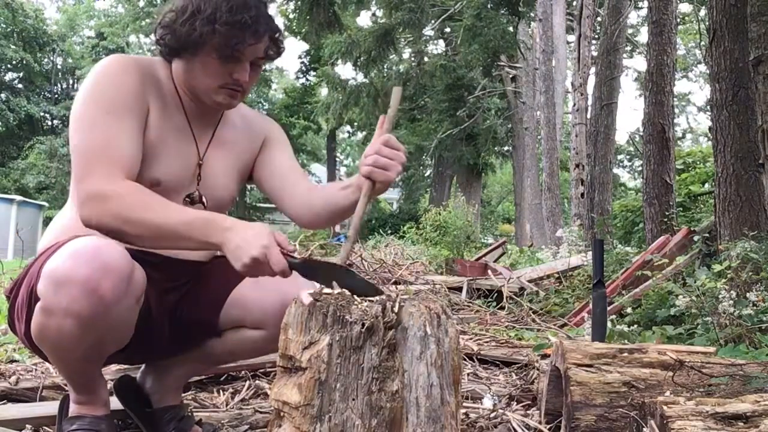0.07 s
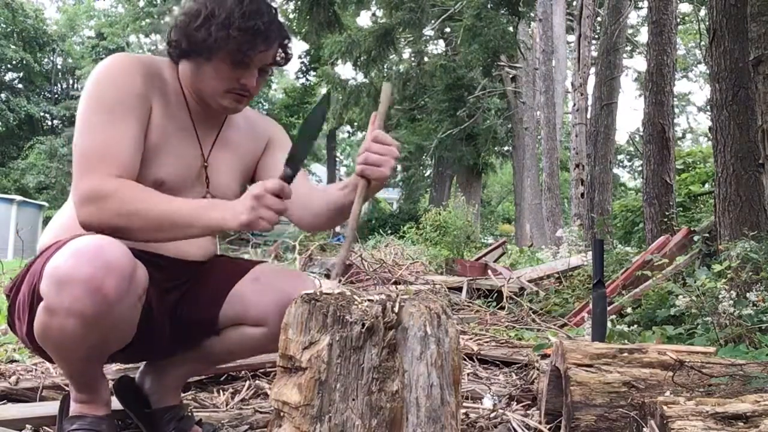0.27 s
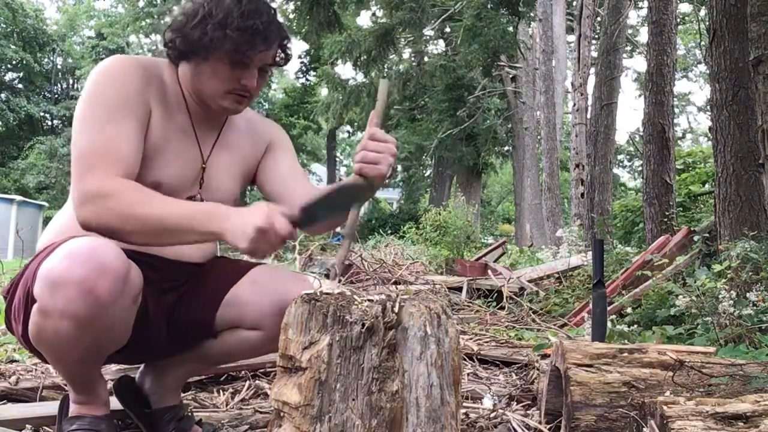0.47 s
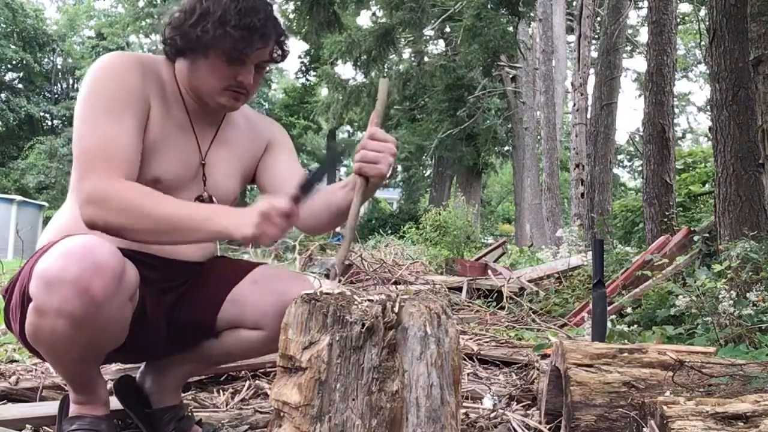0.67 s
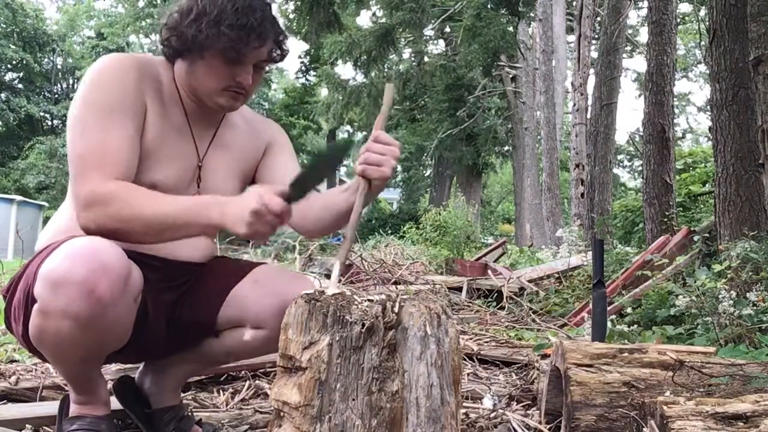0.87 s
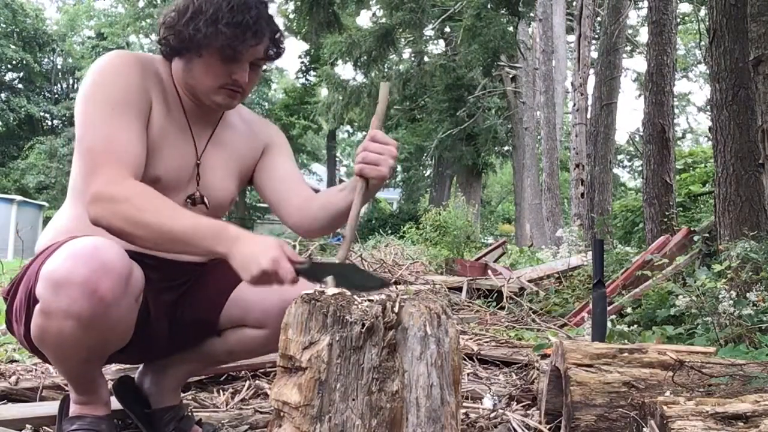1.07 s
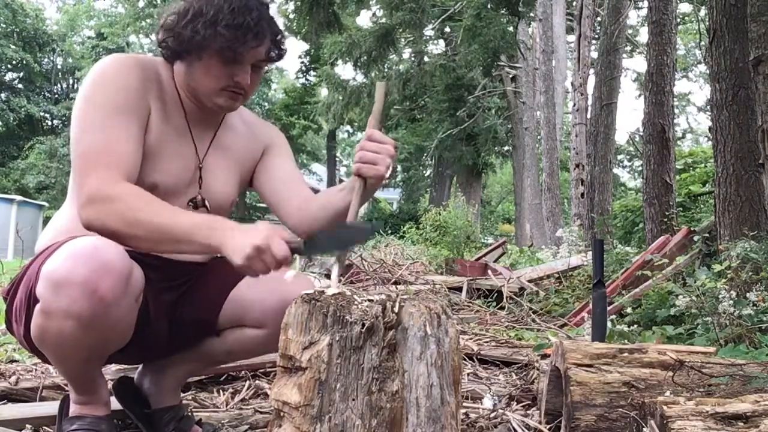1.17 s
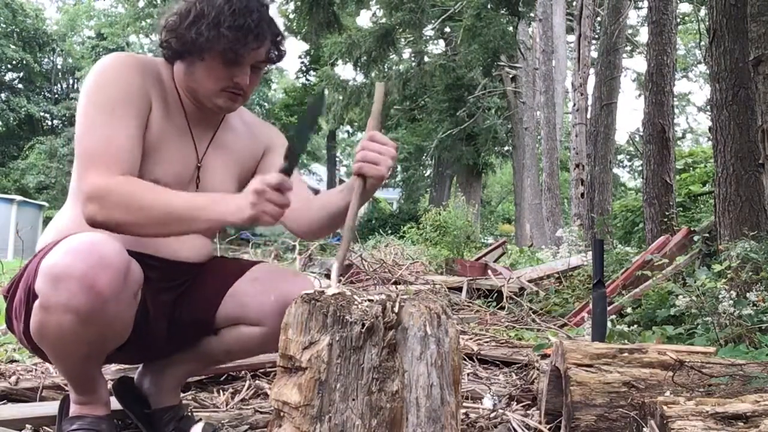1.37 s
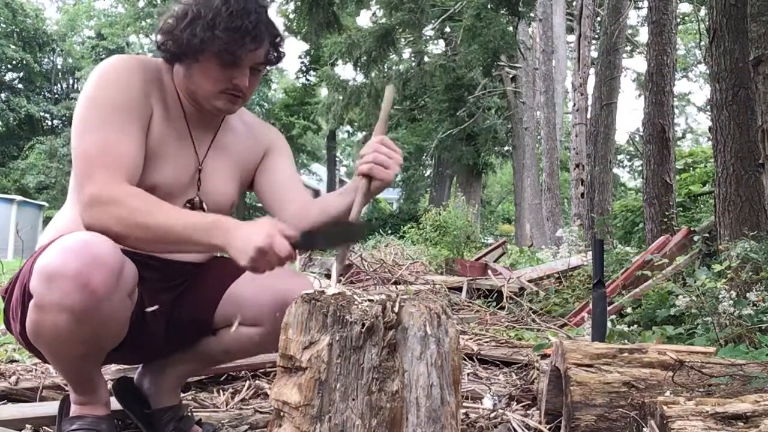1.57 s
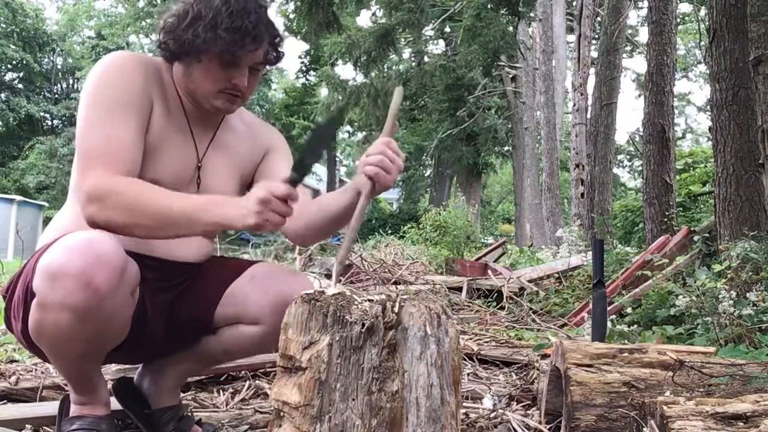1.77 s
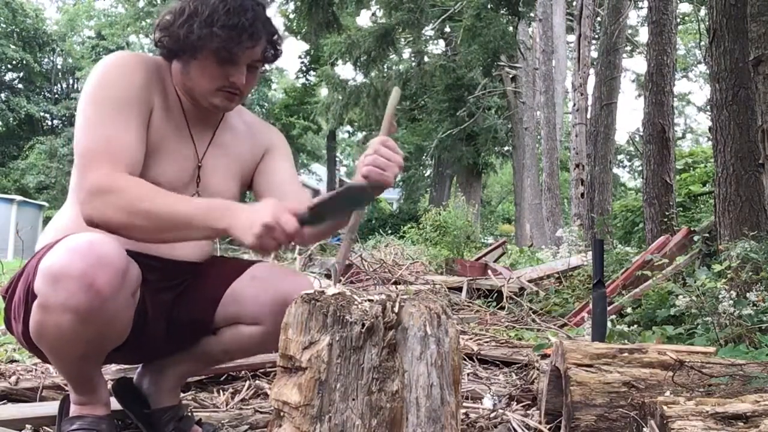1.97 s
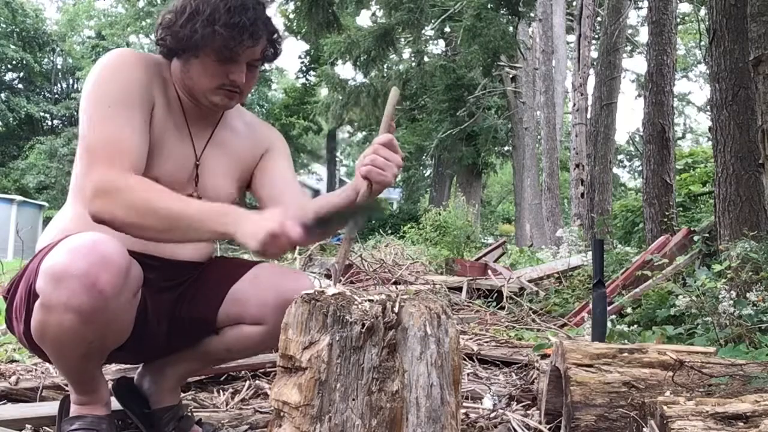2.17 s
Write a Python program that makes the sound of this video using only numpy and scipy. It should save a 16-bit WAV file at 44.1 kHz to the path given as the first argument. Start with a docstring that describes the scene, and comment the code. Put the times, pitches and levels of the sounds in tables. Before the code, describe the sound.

A heavy knife chops into a wooden stick six times in a quick, even rhythm. Each sharp crunch has a low thud beneath it, and four also knock into a stump. Behind the close chops, a faint insect trills in quiet woods.

```python
"""Six sharp, crunching chops: a heavy knife cuts a point onto a wooden stick standing on a stump.
Each chop fractures fibres and excites the damped modes of stick and blade; four carry on and knock
into the stump. A low shudder follows every blow, and the trees of the forest clearing reflect a faint
tail. Faint high ticks and two brief, thin hisses fall among the chops. An insect trills over the
quiet air; one far note sounds."""
import sys
import numpy as np
from scipy import signal
from scipy.fft import rfft, irfft
from scipy.io import wavfile
from scipy.ndimage import uniform_filter1d

SR = 44100
rng = np.random.default_rng(int(sys.argv[2]) if len(sys.argv) > 2 else 0)


def generate_wav(sig):
    """Save sig (samples, or channels by samples) to the path in sys.argv[1] as 16-bit PCM at SR."""
    pcm = np.round(np.clip(np.atleast_2d(sig).T, -1, 1) * 32767).astype(np.int16)
    wavfile.write(sys.argv[1], SR, pcm)


N = 97108
LEAD = SR // 10  # lead-in, so that a blow can begin before time zero
T = np.arange(SR // 3) / SR  # time axis of one event [s]

# Spectra of air, echoes, ticks and hisses, cut fibres and stump crack:
# (frequency [Hz], relative level [dB])
AIR_SPECTRUM = [(10, -16), (25, -2), (60, 0.5), (100, -3.5), (170, -11.5), (260, -18), (450, -20.5),
                (1100, -24), (1900, -20.5), (2700, -24), (4500, -26), (6600, -26), (7900, -28), (9300, -43),
                (13000, -42), (16000, -47)]
ECHO_SPECTRUM = [(60, -13), (400, -4), (1000, -6), (2000, -1.5), (5000, 3), (9000, 2.5), (16000, -4)]
TICK_SPECTRUM = [(100, -30), (2000, -18), (5000, -3), (8000, -7), (11000, -3), (14000, 2), (16000, -6)]
CRUNCH_SPECTRUM = [(60, -6), (300, -3), (800, 0), (1100, -3.5), (1700, 5), (2600, 0.5), (3400, -4),
                   (4300, 2), (5250, -2), (6100, -4.5), (8200, -10.5), (11000, -7), (15500, -8.5)]
CRACK_SPECTRUM = [(100, -5.5), (400, -7), (1000, 2), (1650, 0.5), (2100, -11), (2700, -4), (3400, -15),
                  (5200, -14), (7000, -33), (16000, -26)]
# Normal modes of the struck bodies: (frequency [Hz], relative level [dB], 60 dB decay time [s])
STUMP_MODES = [(143.7, -8, 0.041), (245.3, -2.5, .035), (298, -12, 0.055), (383.2, -0.5, 0.051),
               (708, -3, 0.032)]
STICK_MODES = [(234, -15, 0.037), (656, -22.5, 0.054), (762, -14.5, 0.051), (1548, -2, 0.024),
               (1733, 0, 0.024), (2026, -3, 0.032), (2250, -19, 0.023)]
BLADE_MODES = [(381, -1.5, .06), (3030, 1, 0.074), (3764, -7.5, 0.092), (4770, -11, 0.051),
               (5260, -9, 0.069), (8925, -10, 0.074), (10700, -16, 0.08)]
EDGE_MODES = [(5145, 1, 0.028), (6990, -7, 0.02)]
# Brief, thin hisses: (time [s], hold time [s], level [dB])
THIN_HISSES = [(0.294, .014, -56), (1.035, .016, -62)]
# Faint high ticks: (time [s], level [dB])
HIGH_TICKS = [(0.752, -28), (1.025, -33), (1.040, -27), (1.052, -37), (1.449, -30), (1.530, -38),
              (1.642, -36), (1.815, -35)]
# Low vibration after each blow: (time [s], level [dB])
LOW_SHUDDERS = [(-0.015, -31), (0.386, -32), (0.746, -34), (1.096, -31), (1.475, -33), (1.868, -32)]
# Blows on the stump: (time [s], body [dB], crack [dB], clack frequency [Hz], clack [dB])
STUMP_KNOCKS = [(-0.014, -11, -33, 590, -5), (0.7389, -7.5, -15, 2515, -15),
                (1.085, -11.5, -27.5, 607, -17), (1.468, -8, -14, 940, -6)]
# Cuts into the stick: (time [s], cutting time [s], crunch [dB], treble tilt [dB/octave],
# stick ring [dB], blade ring [dB], edge clink [dB], chip snap [dB])
BLADE_BITES = [(-0.018, 0.0041, -14.5, -0.5, -15.5, -29, -11, -20),
               (0.3681, .0045, -17, 0, -13, -21, -25, -3),
               (0.7223, 0.0055, -18.5, -2, -14, -35, -13.5, -33),
               (1.0790, 0.0039, -14.5, 2.13, -20.5, -25.5, -11.5, -7.5),
               (1.459, 0.0091, -26, 0.3, -25.5, -37, -13.5, -30),
               (1.8490, 0.0062, -20.5, 0.16, -18, -26, -44, -12)]

AIR_DB, AIR_PATCH_DB = -46.5, 1
CALL_START_S, CALL_LENGTH_S, CALL_HZ, CALL_DB = 1.715, .12, 1360, -57
TRILL_HZ, TRILL_BLUR_HZ, TRILL_DB = 6664, 260, -57
STROKE_FALL_HZ, STROKES_PER_S, STROKE_JITTER = 750, 39.6, .04
NEAR_DB, NEAR_T60, FAR_DB, FAR_T60 = -19.5, 0.13, -30, 0.46
SHUDDER_HZ, SHUDDER_PEAK_S, SHUDDER_SHAPE, SHUDDER_TAIL_DB, SHUDDER_T60 = 52.5, 0.05, 3.8, -1, 0.34
IMPULSES_PER_S, IMPULSE_SPREAD_DB = 9000, 5.5
SNAP_DELAY_S, SNAP_TILT_DB = .0022, 1.5


def amp(db):
    """Amplitude ratio of a level in decibels."""
    return 10 ** (np.asarray(db) / 20)


def unit(x):
    """Normalisation to an rms of 1."""
    return x / np.sqrt(np.mean(x ** 2) + 1e-20)


def decay(t, t60):
    """Exponential damping from t = 0: 60 dB in t60 seconds."""
    return np.exp(-np.log(1000) * np.maximum(t, 0) / t60)


def level_at(spectrum, hz):
    """Interpolation of a spectrum along a logarithmic frequency axis."""
    freqs, db = np.transpose(spectrum)
    return np.interp(np.log(hz + 1), np.log(freqs), db)


def add(mix, start_s, sound):
    """Superposition of a sound on a track that has a lead-in."""
    part = mix[max(LEAD + round(start_s * SR), 0):][:len(sound)]
    part += sound[:len(part)]


def colour(x, spectrum, tilt_db=0):
    """Minimum-phase filter of unit energy, tilted by tilt_db per octave above 500 Hz."""
    hz = abs(np.fft.fftfreq(2048, 1 / SR))
    octaves = np.log2(np.maximum(hz, 500) / 500)
    log_gain = np.log(amp(level_at(spectrum, hz) + tilt_db * octaves))
    response = np.exp(np.conj(signal.hilbert(log_gain)))
    taps = np.fft.ifft(response).real[:len(hz) // 2]
    return signal.fftconvolve(x, taps / np.linalg.norm(taps))[:len(x)]


def wander(count, hz):
    """Low-pass noise: smooth random motion up to about hz."""
    freqs = np.fft.rfftfreq(count, 1 / SR)
    return unit(irfft(rfft(rng.standard_normal(count)) * np.exp(-(freqs / hz) ** 2), count))


def blurred_tone(hz, blur_hz):
    """Random modulation widens a pitch curve into a narrow band: a tone blurred by distance."""
    phase = 2 * np.pi * np.cumsum(hz) / SR
    return unit(wander(len(hz), blur_hz) * np.cos(phase) + wander(len(hz), blur_hz) * np.sin(phase))


def air():
    """Broadband noise: low rumble and leaf hiss, its level drifting in time and frequency."""
    hz, _, bands = signal.stft(rng.standard_normal(N), SR, nperseg=2048, noverlap=1536)
    patches = uniform_filter1d(rng.standard_normal(bands.shape), size=16, axis=0)
    patches = unit(uniform_filter1d(patches, size=6, axis=1))
    bands *= amp(level_at(AIR_SPECTRUM, hz)[:, None] + AIR_PATCH_DB * patches)
    return amp(AIR_DB) * unit(signal.istft(bands, SR, nperseg=2048, noverlap=1536)[1][:N])


def far_call():
    """A narrow band under a half-sine envelope: one faint note, perhaps a distant bird."""
    arch = np.sin(np.linspace(0, np.pi, round(CALL_LENGTH_S * SR)))
    return amp(CALL_DB) * arch * blurred_tone(np.full(len(arch), CALL_HZ), blur_hz=70)


def insect():
    """Stridulation: each wing stroke is a short falling chirp."""
    stroke_rate = STROKES_PER_S * (1 + STROKE_JITTER * wander(N, hz=9.1))
    stroke = np.cumsum(stroke_rate) / SR % 1
    tone = blurred_tone(TRILL_HZ + STROKE_FALL_HZ * (.5 - stroke), TRILL_BLUR_HZ)
    return amp(TRILL_DB) * unit(tone * (1 + np.sin(np.pi * stroke) ** 2))


def forest(x, t60):
    """Reverberation: sparse reflections from ground and trunks, arriving after 7 ms."""
    t = np.arange(SR) / SR
    reflections = rng.standard_normal(SR) * (rng.random(SR) < 3000 / SR)  # about 3000 a second
    taps = reflections * decay(t, t60) * (t > .007)
    return signal.fftconvolve(x, colour(taps / np.linalg.norm(taps), ECHO_SPECTRUM))[:len(x)]


def crackle(rise_s, hold_s, t60):
    """Shot noise: a dense burst of random impulses, spectrally flattened."""
    envelope = np.minimum(T / rise_s, 1) * decay(T - hold_s, t60)
    sizes = amp(IMPULSE_SPREAD_DB * np.clip(rng.standard_normal(len(T)), -2, 2))
    signs = rng.choice([-1, 1], len(T))
    impulses = rng.random(len(T)) < IMPULSES_PER_S / SR
    spectrum = rfft(envelope * sizes * signs * impulses)
    band_rms = np.sqrt(uniform_filter1d(abs(spectrum) ** 2, size=160) + 1e-12)
    burst = irfft(spectrum / band_rms, len(T)) * (T < hold_s + t60)
    return burst * np.linalg.norm(envelope) / np.linalg.norm(burst)


def thin_hiss(hold_s):
    """Filtered shot noise: a brief, thin hiss."""
    return colour(crackle(rise_s=0.0028, hold_s=hold_s, t60=.03), TICK_SPECTRUM)


def click(spectrum, tilt_db=0):
    """Impulse response: one sharp click with the given spectrum."""
    return colour(signal.unit_impulse(len(T)), spectrum, tilt_db)


def shudder():
    """Damped oscillation: a deep vibration swells and dies away."""
    age = T / SHUDDER_PEAK_S
    swell = (age * np.exp(1 - age)) ** SHUDDER_SHAPE
    tail = amp(SHUDDER_TAIL_DB) * np.minimum(age, 1) * decay(T - SHUDDER_PEAK_S, SHUDDER_T60)
    fade = 1 - (T / T[-1]) ** 2
    return np.maximum(swell, tail) * np.sin(2 * np.pi * SHUDDER_HZ * T) * fade


def ring(modes, rise_s):
    """Modal vibration: damped sines of alternating sign build up while the blow pushes on them."""
    partials = ((-1) ** k * amp(db) * decay(T, t60) * np.sin(2 * np.pi * hz * T)
                for k, (hz, db, t60) in enumerate(modes))
    return np.minimum(T / rise_s, 1) * sum(partials)


def knock(body_db, crack_db, clack_hz, clack_db):
    """Impact on the stump: hollow body modes, a dull crack and a clack pitched by the spot struck."""
    impact_rise_s = 0.00086
    body = amp(body_db) * ring(STUMP_MODES, rise_s=0.0041)
    crack = amp(crack_db) * colour(crackle(impact_rise_s, hold_s=0.0022, t60=0.024), CRACK_SPECTRUM)
    clack = ring([(clack_hz, clack_db, 0.024)], impact_rise_s)
    return body + crack + clack


def bite(cut_s, crunch_db, tilt_db, stick_db, blade_db, clink_db, snap_db):
    """Fracture and resonance: fibres tear and a chip snaps off, while stick, blade and edge ring."""
    fibres = crackle(rise_s=0.0014, hold_s=cut_s, t60=0.026)
    crunch = amp(crunch_db) * colour(fibres, CRUNCH_SPECTRUM, tilt_db)
    snap = amp(snap_db) * np.roll(click(CRUNCH_SPECTRUM, SNAP_TILT_DB), round(SNAP_DELAY_S * SR))
    stick = amp(stick_db) * ring(STICK_MODES, rise_s=0.00078)
    blade = amp(blade_db) * ring(BLADE_MODES, rise_s=0.0032)
    clink = amp(clink_db) * ring(EDGE_MODES, rise_s=0.0039)
    return crunch + snap + stick + blade + clink


def scene():
    """Superposition of the chops, their reflections and the forest background."""
    chops, echoless = np.zeros((2, LEAD + N))
    for start_s, *cut in BLADE_BITES:
        add(chops, start_s, bite(*cut))
    for start_s, *blow in STUMP_KNOCKS:
        add(chops, start_s, knock(*blow))
    for start_s, db in HIGH_TICKS:
        add(chops, start_s, amp(db) * click(TICK_SPECTRUM))
    for start_s, db in LOW_SHUDDERS:
        add(echoless, start_s, amp(db) * shudder())
    for start_s, hold_s, db in THIN_HISSES:
        add(echoless, start_s, amp(db) * thin_hiss(hold_s))
    add(echoless, CALL_START_S, far_call())
    echoes = amp(NEAR_DB) * forest(chops, NEAR_T60) + amp(FAR_DB) * forest(chops, FAR_T60)
    return ((chops + echoes + echoless)[LEAD:] + air() + insect())[None]


def record(dry):
    """Soft saturation rounds the peaks; a low-pass filter then limits the band."""
    ceiling, cutoff_hz = .65, 16200
    rounded = dry / (1 + (dry / ceiling) ** 4) ** .25
    low_pass = signal.firwin(255, cutoff_hz, window=("kaiser", 9), fs=SR)
    return signal.oaconvolve(rounded, low_pass[None], "same")


dry = scene()
out = record(dry)
generate_wav(out)
```